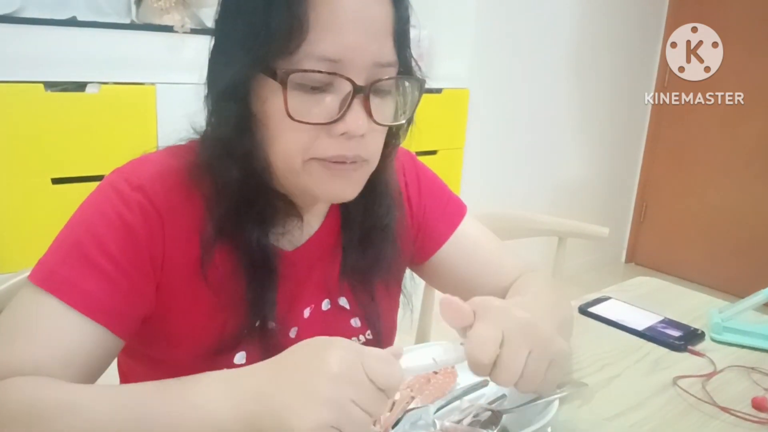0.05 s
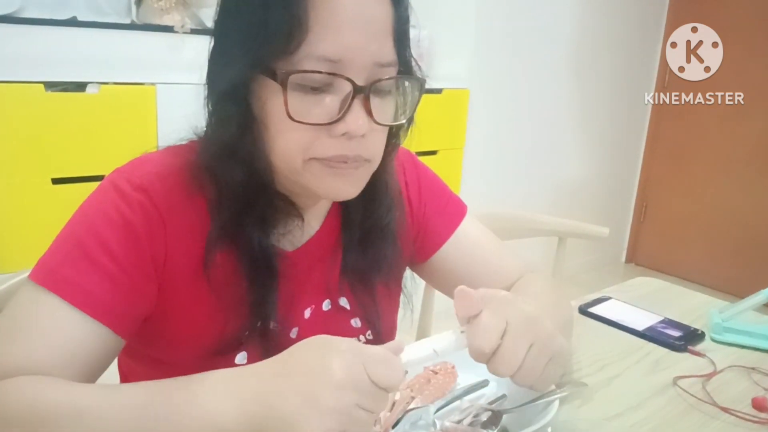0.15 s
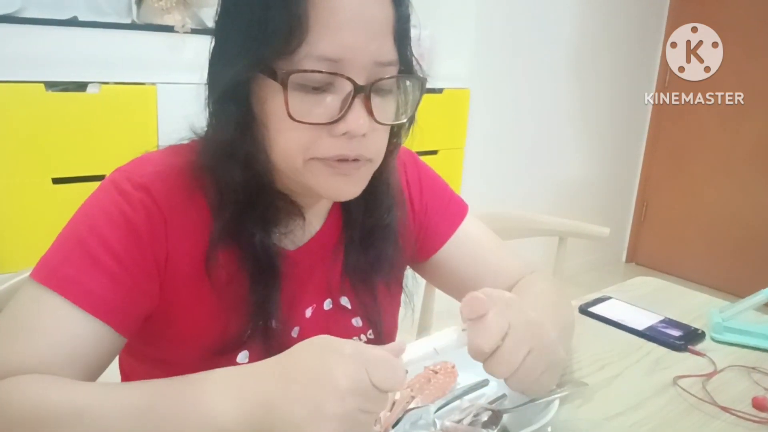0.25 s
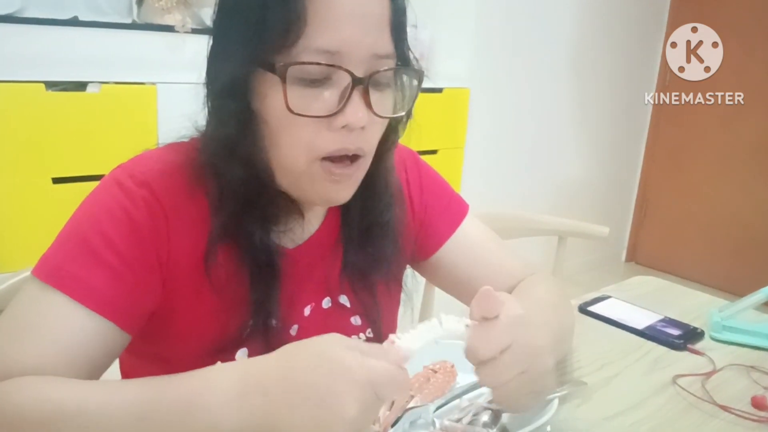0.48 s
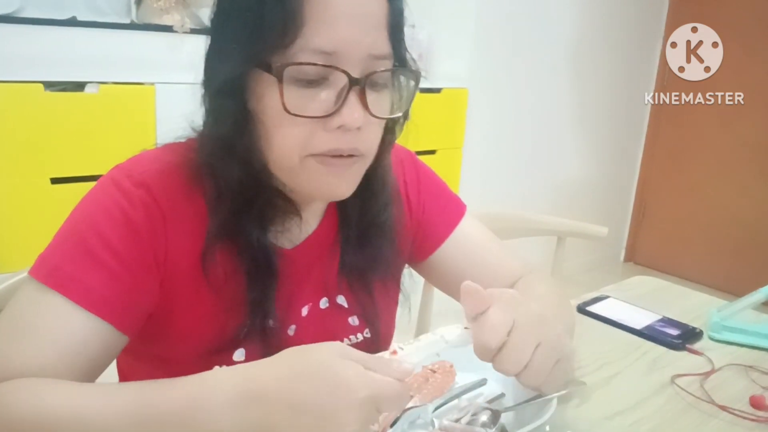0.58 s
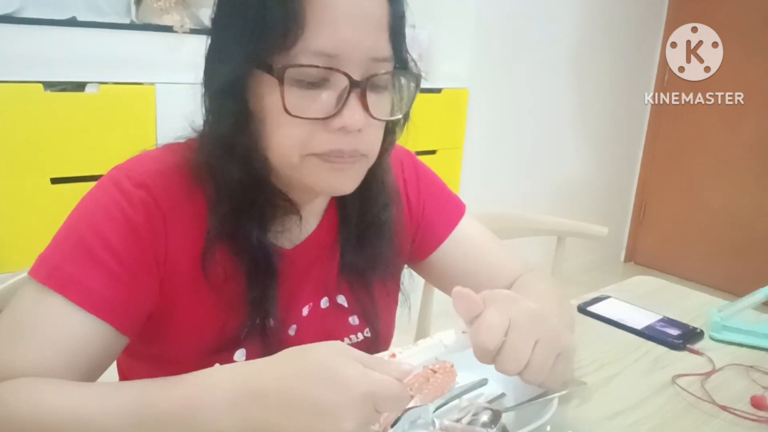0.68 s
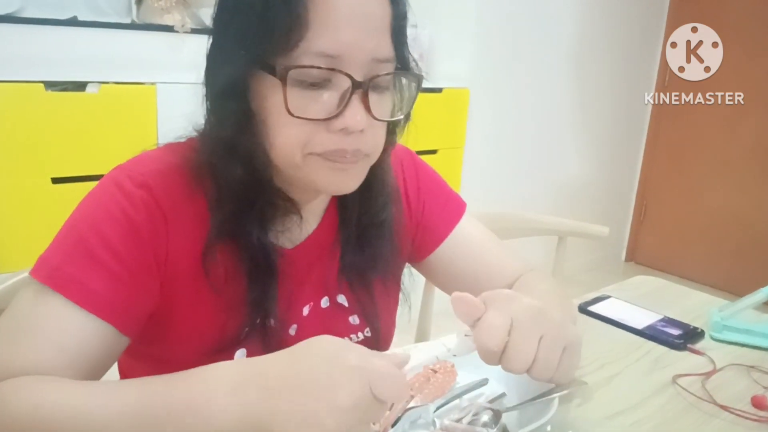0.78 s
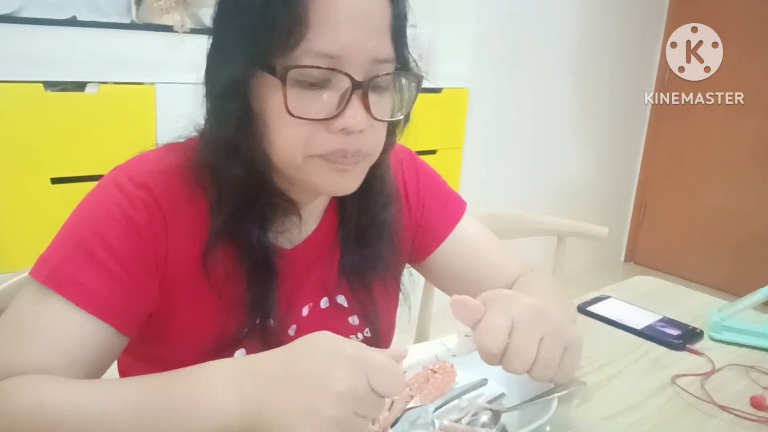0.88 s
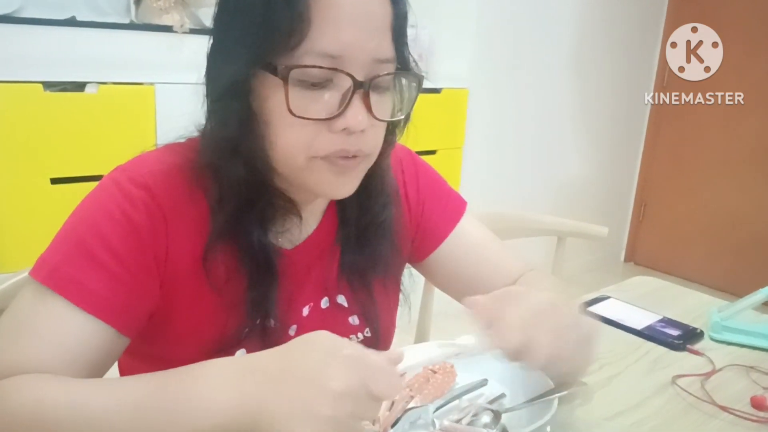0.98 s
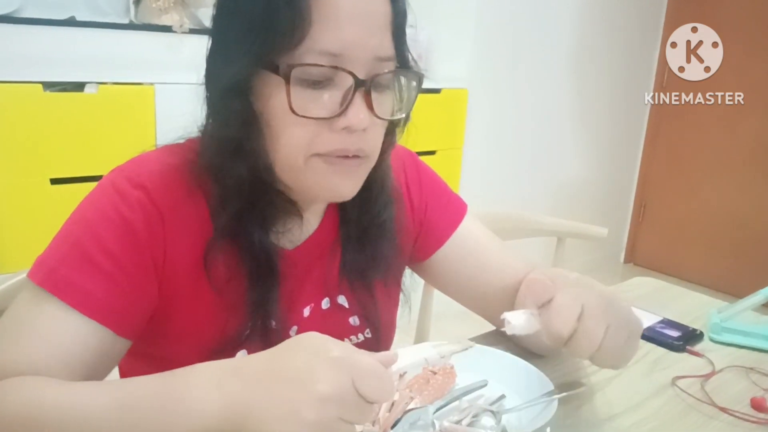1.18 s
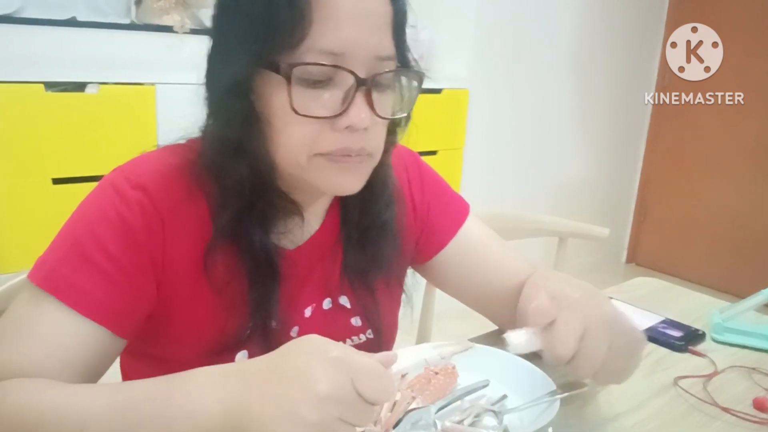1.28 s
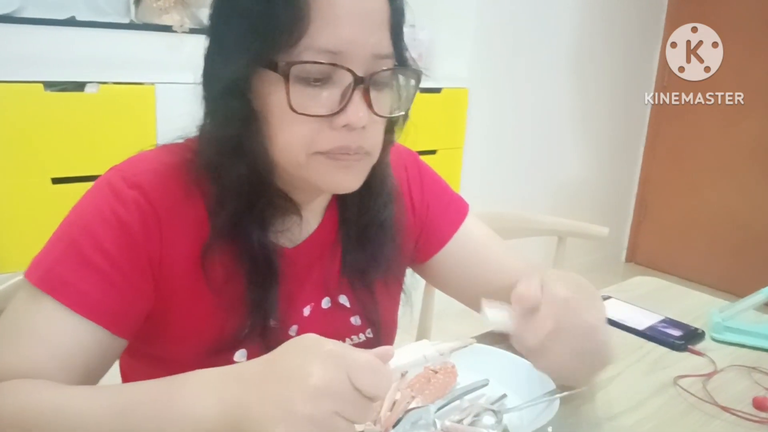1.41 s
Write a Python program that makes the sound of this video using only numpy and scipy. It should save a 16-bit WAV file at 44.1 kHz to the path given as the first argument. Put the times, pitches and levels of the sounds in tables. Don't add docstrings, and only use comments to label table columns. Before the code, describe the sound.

A cooked crab shell snaps loudly at about 0.22 s, a dry, bright crack tearing in several very quick steps, after a small tick at 0.09. The hard-walled room rings about half a second with a slap echo. Light splinter clicks and faint finger rubs come at 0.41-0.5, 0.9-0.95 and 1.0-1.1 s, nearly nothing afterward. Quiet mains hum, rumble, fan rush and hiss continue throughout, picked up by a close phone.

```python
import sys
import numpy as np
from scipy import signal
from scipy.fft import rfft, irfft, next_fast_len
from scipy.io import wavfile
from scipy.ndimage import uniform_filter1d, map_coordinates

SR = 44100
rng = np.random.default_rng(int(sys.argv[2]) if len(sys.argv) > 2 else 0)


def master_out(mix):
    frames = np.transpose(np.atleast_2d(mix))
    ceiling = np.clip(frames, -1, 1)
    pcm = np.round(ceiling * 32767).astype(np.int16)
    wavfile.write(sys.argv[1], SR, pcm)


def level_to_linear(level):
    exponent = np.asarray(level, float) / 20
    return 10 ** exponent


N = 63945
T = np.arange(N) / SR


def unit(x):
    return x / np.sqrt(np.mean(x ** 2) + 1e-20)


def along(points, hz):
    f, v = np.transpose(points)
    return np.interp(np.log(hz + 1), np.log(f + 1), v)


def wobble(rate_hz):
    return map_coordinates(rng.standard_normal(N // 50), [T * rate_hz])


def filtered(x, response):
    m = next_fast_len(len(x) + 8192)
    return irfft(rfft(x, m) * response(np.fft.rfftfreq(m, 1 / SR)), m)[:len(x)]


def highs(x, hz):
    return signal.sosfilt(signal.butter(2, hz, "high", fs=SR, output="sos"), x)


def band(length, hz, octaves):
    noise = rng.standard_normal(length)
    return unit(filtered(noise, lambda f: np.exp(-.5 * (np.log2((f + 1) / hz) / octaves) ** 2)))


def rush(spectrum, patchy_db):
    z = signal.stft(rng.standard_normal(N), nperseg=512)[2]
    field = uniform_filter1d(rng.standard_normal(z.shape), size=5, axis=0)
    field = uniform_filter1d(field, size=8, axis=1)
    x = signal.istft(z * level_to_linear(patchy_db * unit(field)), nperseg=512)[1][:N]
    return unit(filtered(x, lambda f: level_to_linear(along(spectrum, f))))


# frequency in Hz, level in dB rms.
HUM_LINES = [(199.2, -53.5), (301.5, -66), (349.9, -66.5), (597.5, -70), (947.5, -71.5), (1265, -82.5)]
# frequency in Hz, density in dB per Hz.
RUMBLE_SPECTRUM = [(18, -60), (30, -30.5), (76, -4.5), (150, -7.5), (199, -10), (250, -10), (450, -15),
                   (580, -42), (990, -120)]
FAN_SPECTRUM = [(260, -36), (450, -12), (1050, -3), (1400, -5), (1850, -10), (3300, -13), (4500, -27),
                (6000, -60)]
HISS_SPECTRUM = [(2650, -22.5), (4500, -8.5), (4920, -4.5), (5690, -5), (7110, -11.5), (9370, 1),
                 (12000, -14.5), (15600, -14.5)]


def room_tone():
    sway_db = 1.5
    out = np.zeros(N)
    for hz, db in HUM_LINES:
        phase = 2 * np.pi * hz * T + 1.2 * wobble(7.6)
        out += np.sqrt(2) * level_to_linear(db + sway_db * wobble(9)) * np.sin(phase)
    out += level_to_linear(-55) * rush(RUMBLE_SPECTRUM, patchy_db=1.5)
    out += level_to_linear(-55.5 + 0.67 * wobble(7.3)) * rush(FAN_SPECTRUM, patchy_db=1.4)
    out += level_to_linear(-75.5 + .8 * wobble(4)) * rush(HISS_SPECTRUM, patchy_db=1.7)
    return out


# frequency in Hz, t60 in s.
ROOM_T60 = [(200, 0.6), (1000, .55), (3000, .52), (6000, 0.52), (10000, .48), (15000, .46)]


def decay(tone, start_s, peaks=()):
    def response(f):
        lift_db = sum(db / (1 + (2 * (f - hz) / width_hz) ** 2) for hz, width_hz, db in peaks)
        return level_to_linear(along(tone, f) + lift_db)

    x = unit(filtered(rng.standard_normal(N), response))
    hz, t, z = signal.stft(x, SR, nperseg=256)
    fall_db = -60 * np.maximum(t - start_s, 0) / along(ROOM_T60, hz)[:, None]
    x = signal.istft(z * level_to_linear(fall_db), SR, nperseg=256)[1][:N]
    onset = np.clip((T - start_s) / .005, 0, 1)
    uneven_db = 1.5 * wobble(120)
    return x * onset * level_to_linear(uneven_db)


def earlier_tail():
    tone = [(2000, -15.5), (3500, 1.5), (6500, -7.5), (9800, 7.5), (12000, -4), (15500, -0.5)]
    return level_to_linear(-58) * decay(tone, -0.0071)


# start in s, length in s,
# level in dB, centre in Hz, width in octaves.
FINGER_RUBS = [(0.437, 0.048, -57, 4900, .015), (.44, 0.04, -61, 4530, .015),
               (0.466, 0.096, -61.5, 12500, .45), (0.576, 0.051, -55, 2430, 0.044),
               (0.64, 0.12, -74, 5035, 0.12), (0.899, 0.19, -73.5, 9400, 0.078),
               (.902, 0.053, -60.5, 4000, .3), (0.906, .06, -73, 6900, .04),
               (1.009, 0.046, -57, 2940, 0.12), (1.073, .045, -59.5, 3280, 0.069),
               (1.104, 0.047, -70, 9060, .12)]


def rubs():
    out = np.zeros(N)
    for start_s, length_s, db, hz, octaves in FINGER_RUBS:
        progress = np.clip((T - start_s) / length_s, 0, 1)
        stroke = np.sin(np.pi * progress ** .4)
        out += level_to_linear(db + 2 * wobble(60.36)) * stroke * band(N, hz, octaves)
    return out


# start in s, level in dB, centre in Hz, width in octaves, t60 in s.
SPLINTERS = [(.0875, -34, 13000, 1.7, 0.0091), (.106, -52.5, 9500, .4, 0.011), (.412, -52, 10000, .6, .01),
             (.4402, -42, 7980, 1.4, 0.0079), (.4685, -43, 11000, .55, .012),
             (.4757, -37, 5030, 1.44, .022), (0.4775, -31.5, 9000, 1.2, 0.0047),
             (.5025, -46, 8000, 1.2, .009), (.899, -45, 9050, 0.38, 0.01), (.915, -48, 9000, 1.2, 0.011),
             (.922, -49, 11000, .7, 0.01), (0.929, -53, 10000, 1.2, .011), (.946, -50, 9300, 0.13, 0.0084),
             (.953, -63, 12840, .6, .012), (1.004, -55, 2850, .3, 0.032), (1.010, -54.5, 8940, .5, 0.024),
             (1.014, -47.5, 4000, 0.53, 0.017), (1.027, -45.5, 3330, .35, 0.019),
             (1.038, -47.5, 3000, 0.12, 0.016), (1.0715, -50.5, 11000, 2, .018),
             (1.0795, -46.5, 2960, 0.28, 0.016), (1.080, -54, 10100, .8, .01), (.998, -58, 10000, .8, .01),
             (1.27, -68, 9300, .3, 0.037)]
# start in s, level in dB, pitch in Hz, t60 in s.
SHELL_PINGS = [
    (.24, -54.5, 138.4, 0.28),
    (.4405, -48, 4700, .02),
    (0.4658, -51, 1010, 0.05),
    (.8983, -48, 4600, .016),
    (.8988, -47.5, 5470, 0.018),
    (1.072, -57, 1940, 0.047),
    (0.86, -65.5, 4200, 0.039),
    (1.365, -70, 4900, .06),
]
# frequency in Hz, gain in dB.
PORT_COLOUR = [(2000, 8.5), (3400, 5.5), (5000, -2), (6500, -9.5), (8200, -3.5), (9600, 6), (11500, -4),
               (15000, -3)]


def ticks():
    out, t = np.zeros(N + SR), T[:SR // 4]
    ping_octaves = .13
    pings = [(s, db, hz, ping_octaves, t60) for s, db, hz, t60 in SHELL_PINGS]
    for start_s, db, hz, octaves, t60_s in list(SPLINTERS) + pings:
        envelope = level_to_linear(db - 60 * t / t60_s) * (1 - np.exp(-t / 0.00059))
        out[round(start_s * SR):][:len(t)] += envelope * band(len(t), hz, octaves)
    out = filtered(out, lambda f: level_to_linear(along(PORT_COLOUR, f)))[:N]
    tail = decay([(500, 0.0064), (16000, 0)], 0.0063)
    tail /= np.linalg.norm(tail)
    return out + level_to_linear(-5.5) * signal.fftconvolve(out, tail)[:N]


# frequency in Hz, density in dB per Hz.
TAIL_SPECTRUM = [(300, -31), (600, -28), (1000, -21.5), (2800, -15), (4300, -18.5), (5600, -26),
                 (8200, -21.5), (15500, -26.5)]
# centre in Hz, width in Hz, lift in dB.
TAIL_RESONANCES = [(1650, 250, 8), (2250, 200, 5), (3450, 750, 12), (9900, 1500, 14)]


def snap_tail():
    return level_to_linear(-27) * decay(TAIL_SPECTRUM, .228, TAIL_RESONANCES)


# start in s, level in dB, brightness in dB per octave.
FRACTURE_STEPS = [
    (.2218, -54, 0.1),
    (0.224, -9.5, 1.35),
    (.2255, -11.5, 1),
    (0.2271, -14, 0.56),
    (0.2279, -16.5, -1),
    (.2300, -28, -2.5),
]
# frequency in Hz, level in dB, t60 in s.
SHELL_MODES = [(120, -27, .07), (343, -26.5, .012), (720, -15, .011), (1150, -11.5, 0.01),
               (1650, -6, 0.011), (2240, -7, .012), (3122, -1.5, 0.013), (3614, -11, .011),
               (4790, -12.5, 0.0083), (5624, -14, .01), (7200, -14, 0.0068), (8990, -3.5, 0.0084),
               (10240, -4, .013), (11490, -9, .009), (15100, -18.5, .007)]
# delay in s, level in dB.
WALL_SLAPS = [(.009, -18), (.012, -16.5), (.0195, -18), (.023, -19), (.048, -13), (.053, -16), (.067, -22)]


def snap():
    out, t = np.zeros(N), T[:SR // 4]
    hz, mode_db, t60_s = np.transpose(SHELL_MODES)[..., None]
    for start_s, db, tilt_db in FRACTURE_STEPS:
        luck = rng.standard_normal((len(SHELL_MODES), 2))
        start_db = mode_db + tilt_db * np.log2(hz / 5000) + luck[:, :1]
        phase = 2 * np.pi * hz * t + 0.35 * luck[:, 1:]
        ring = (level_to_linear(start_db - 60 * t / t60_s) * np.sin(phase)).sum(0)
        rip = level_to_linear(-7 - 60 * t / 0.0078) * band(len(t), 11000, 0.59)
        attack = 1 - np.exp(-t / 0.0002085)
        out[round(start_s * SR):][:len(t)] += level_to_linear(db) * (ring + rip) * attack
    out = highs(out, 55)
    bright = highs(out, 1288)
    return out + sum(level_to_linear(db) * np.roll(bright, round(delay_s * SR)) for delay_s, db in WALL_SLAPS)


def scene():
    return (room_tone() + earlier_tail() + rubs() + ticks() + snap_tail() + snap())[None]


def band_limit(x):
    return signal.sosfilt(signal.butter(12, 16830, fs=SR, output="sos"), x)


def record(dry):
    top_hz = 15450
    edge = signal.ellip(8, .3, 34, top_hz, fs=SR, output="sos")
    mix = signal.sosfilt(edge, dry)
    return band_limit(mix)


dry = scene()
out = record(dry)
master_out(out)
```